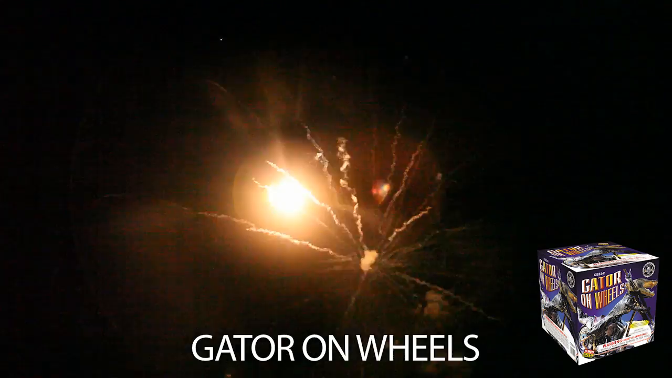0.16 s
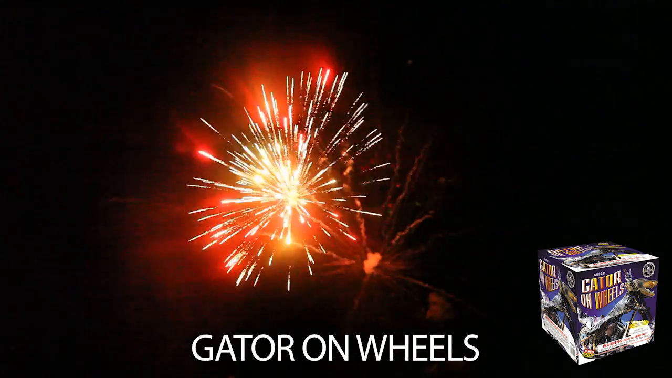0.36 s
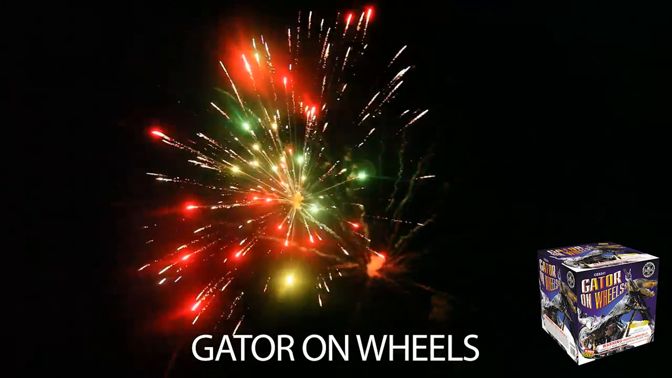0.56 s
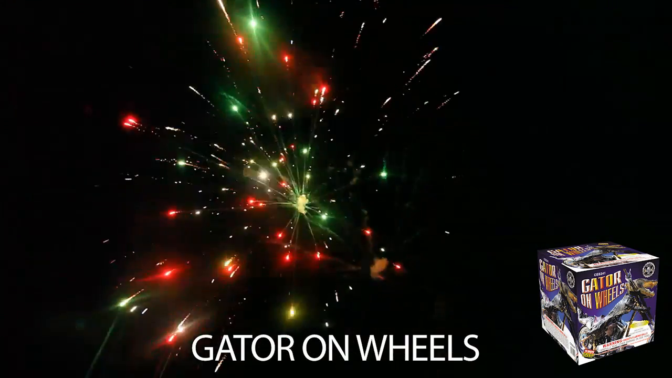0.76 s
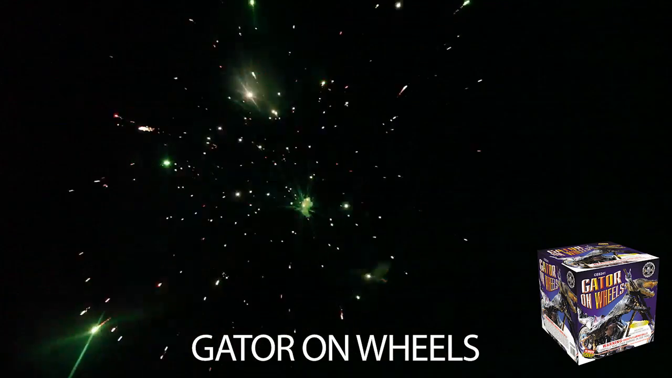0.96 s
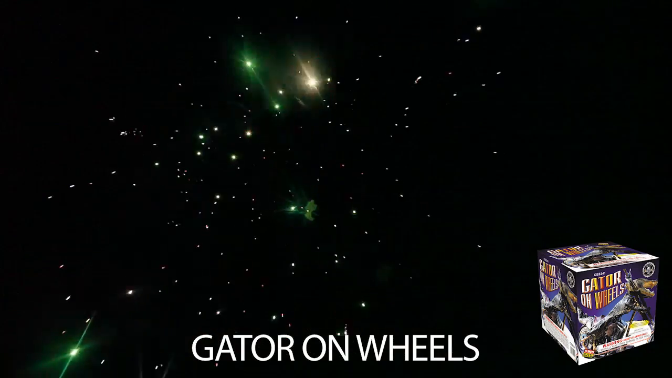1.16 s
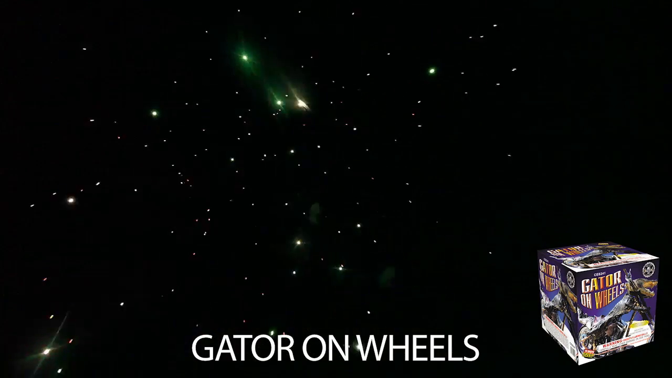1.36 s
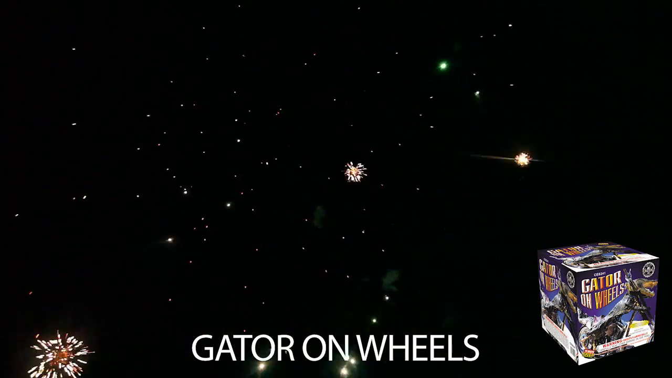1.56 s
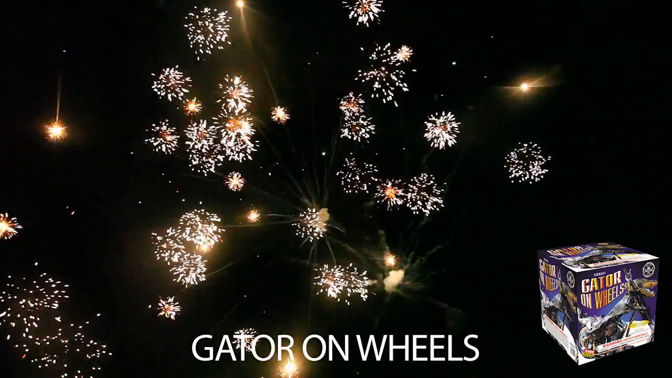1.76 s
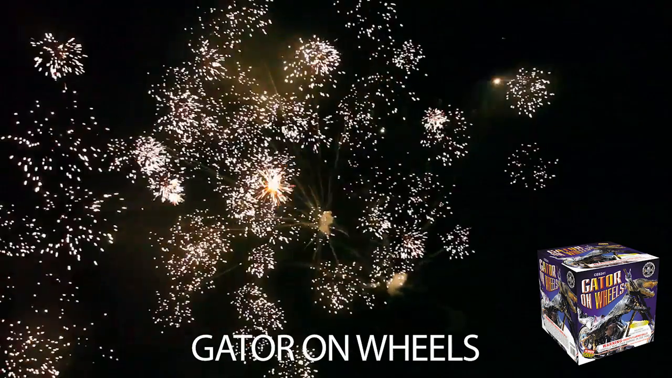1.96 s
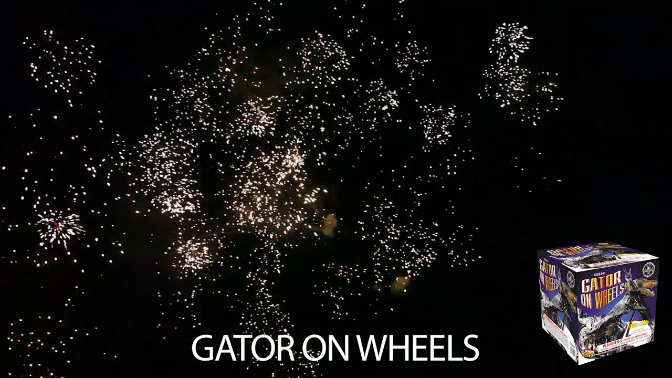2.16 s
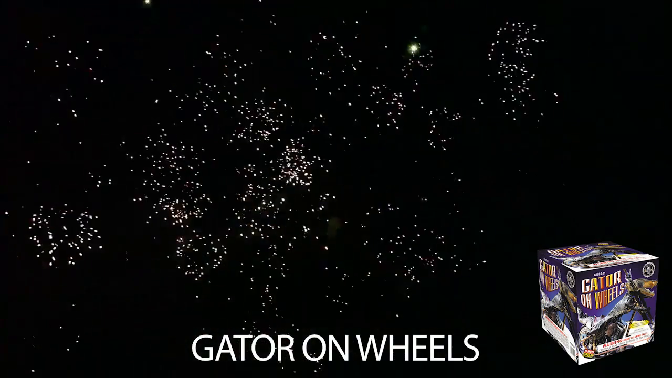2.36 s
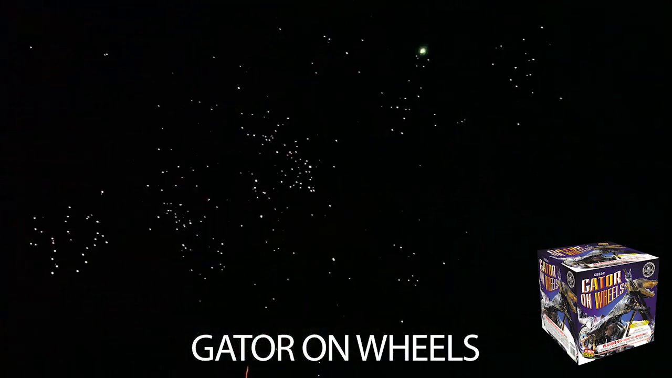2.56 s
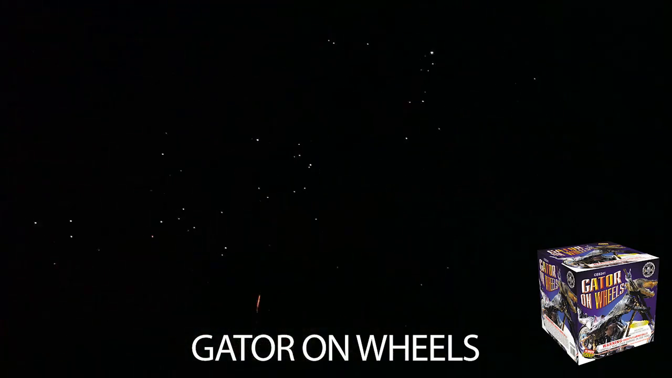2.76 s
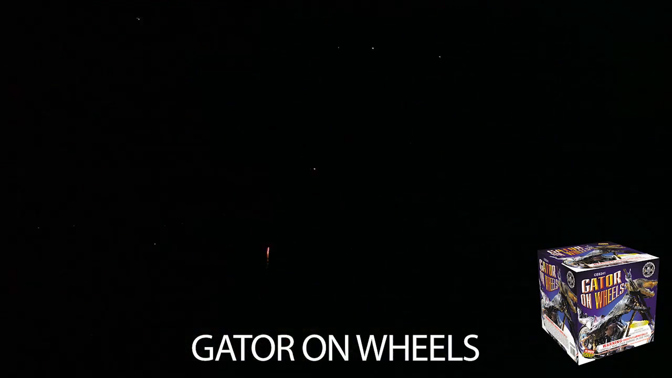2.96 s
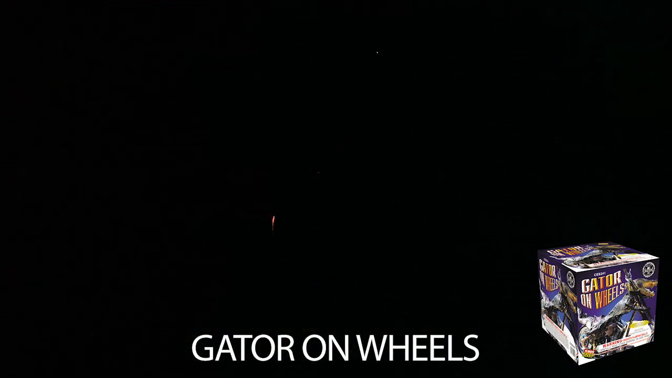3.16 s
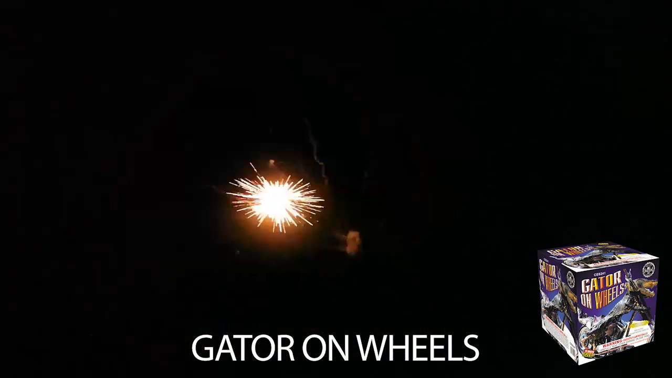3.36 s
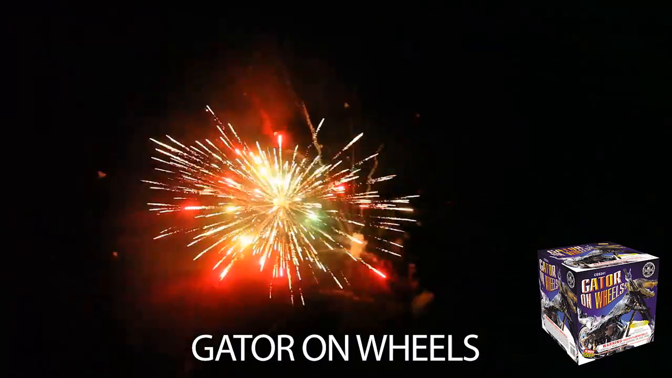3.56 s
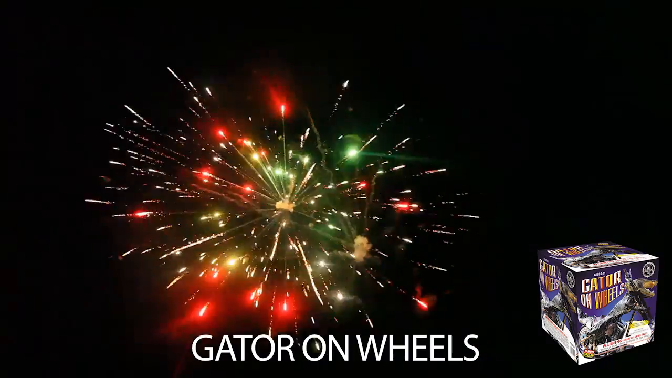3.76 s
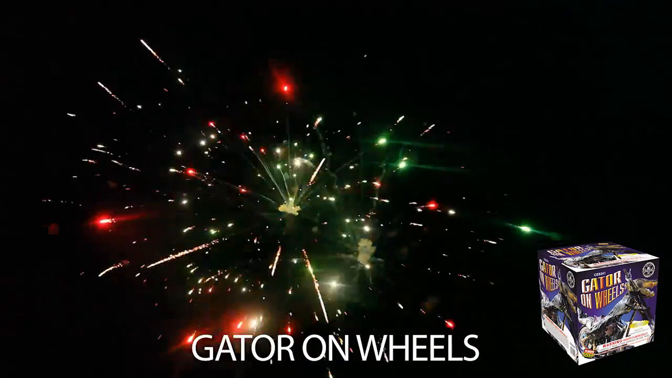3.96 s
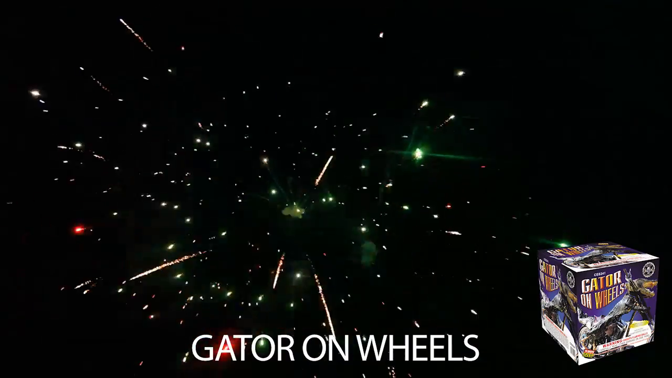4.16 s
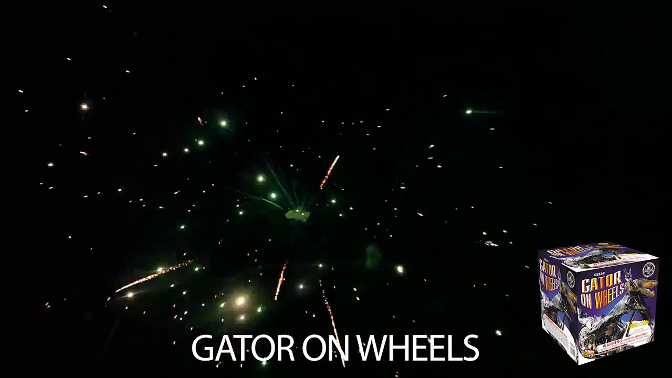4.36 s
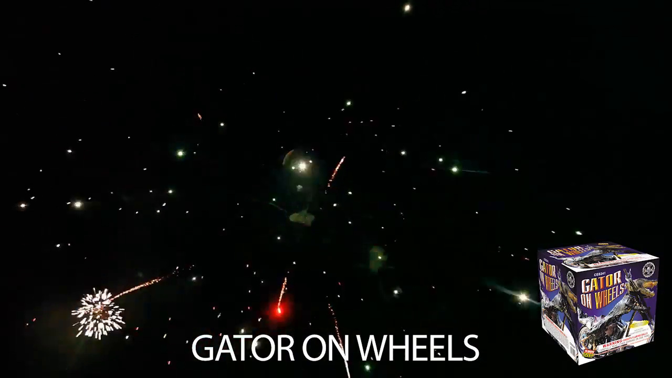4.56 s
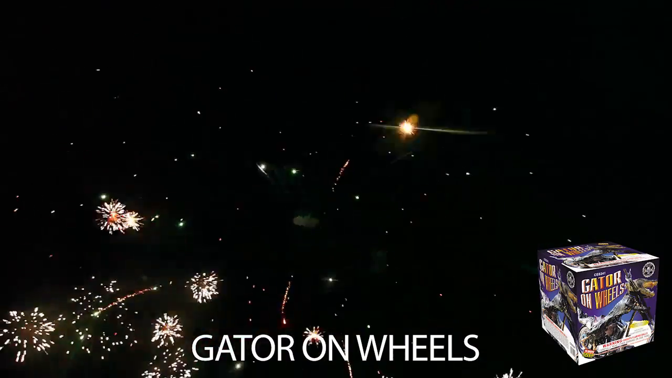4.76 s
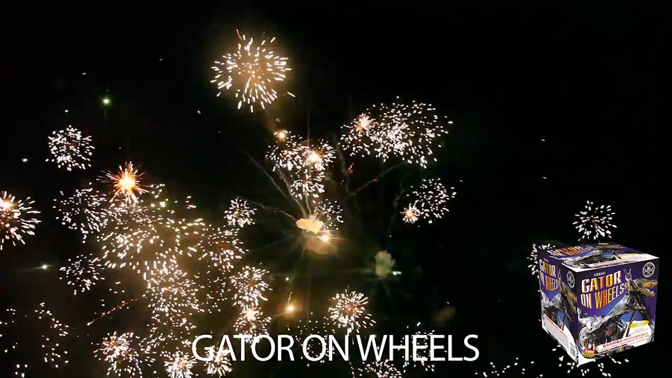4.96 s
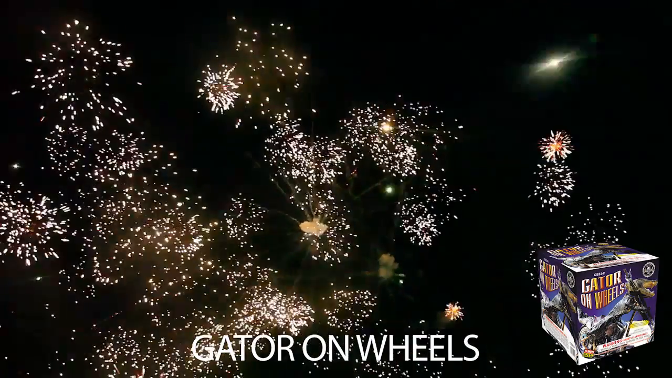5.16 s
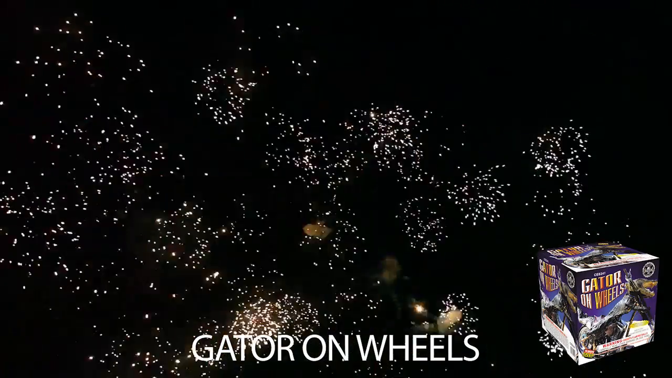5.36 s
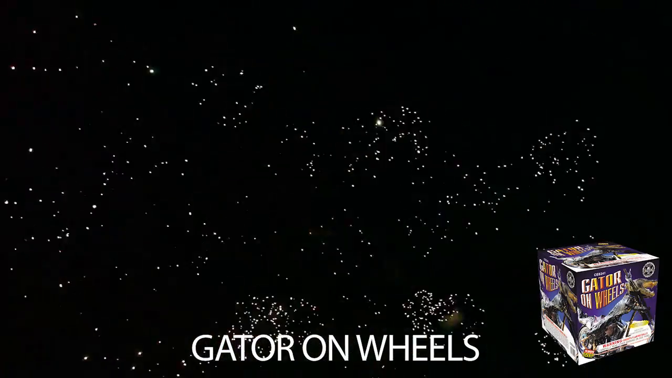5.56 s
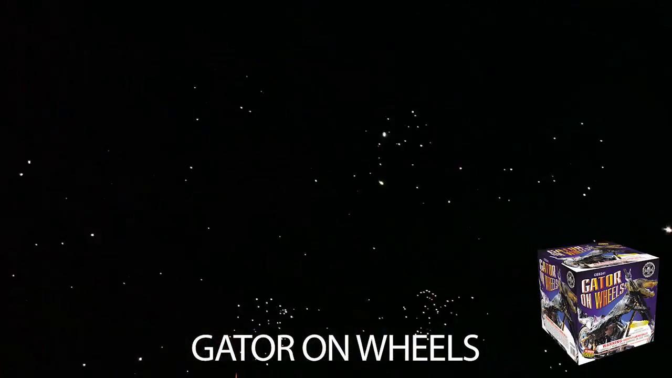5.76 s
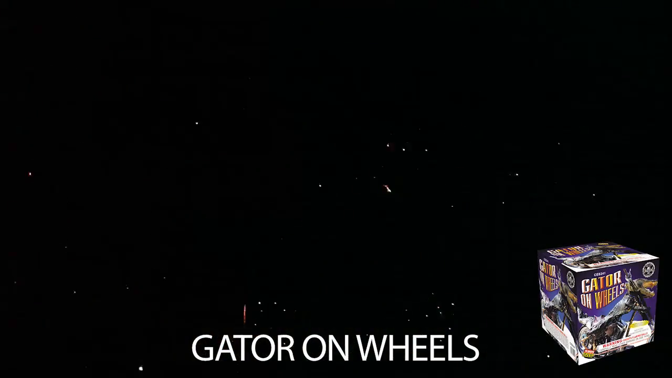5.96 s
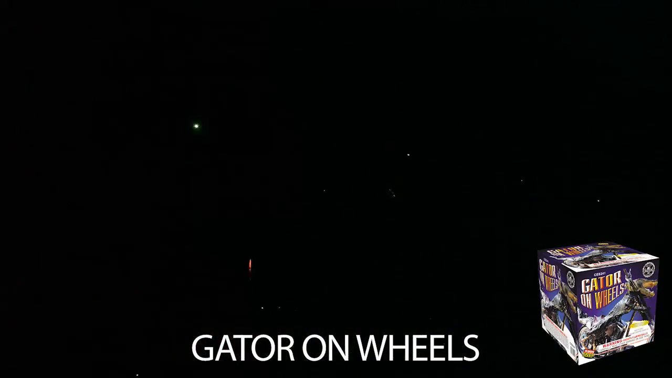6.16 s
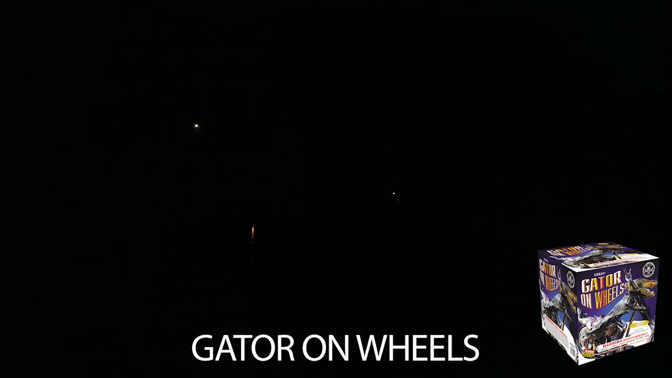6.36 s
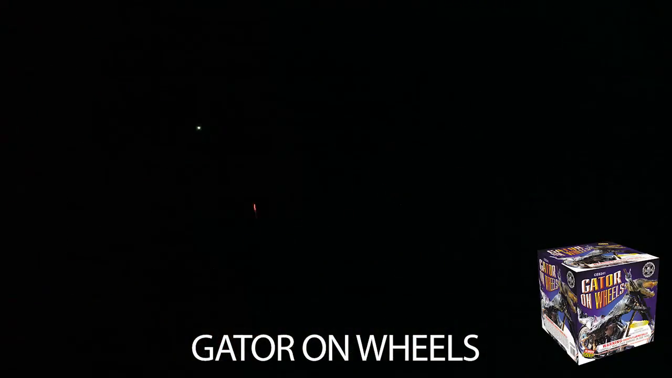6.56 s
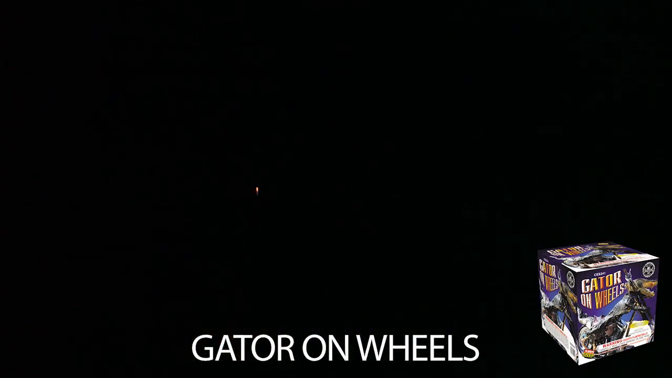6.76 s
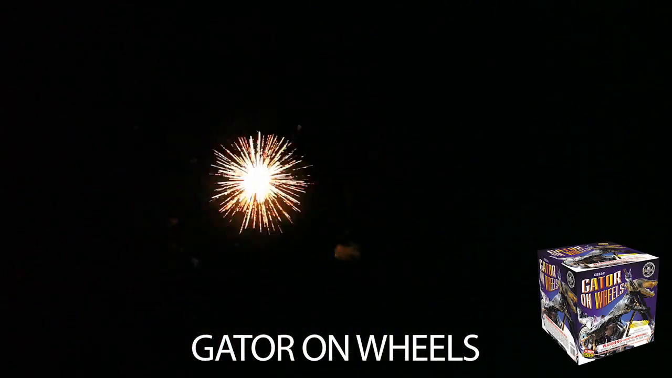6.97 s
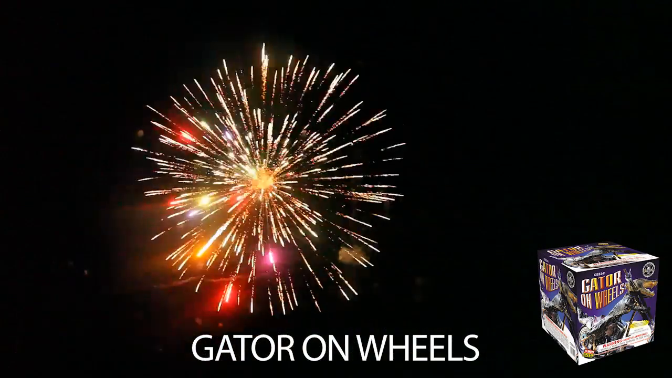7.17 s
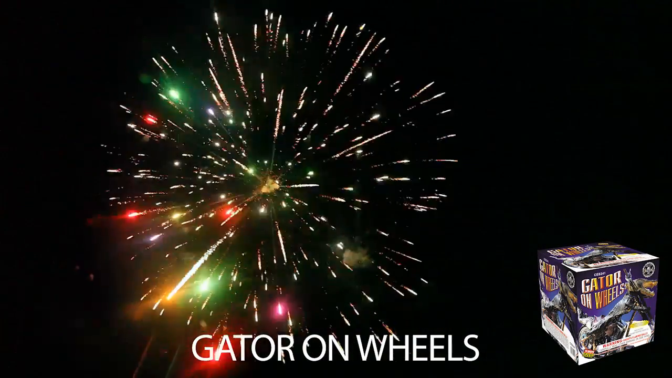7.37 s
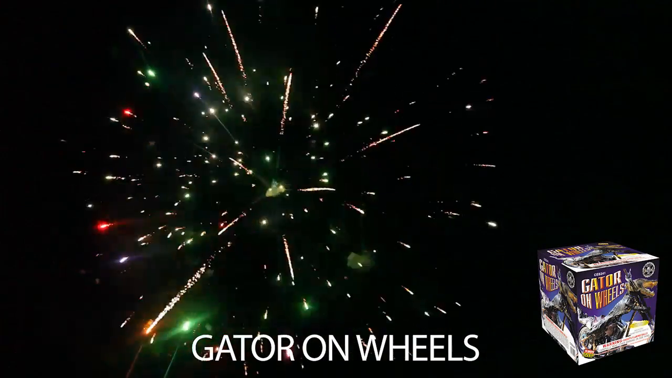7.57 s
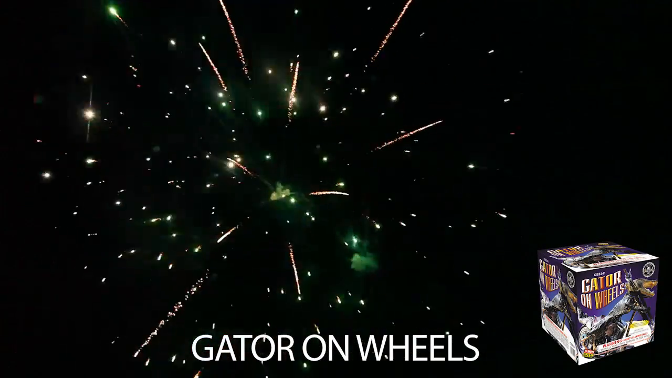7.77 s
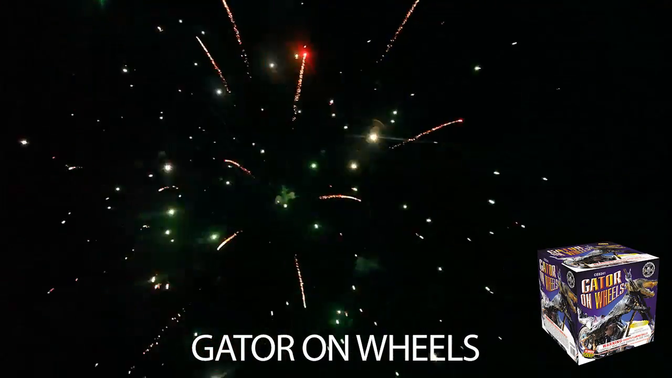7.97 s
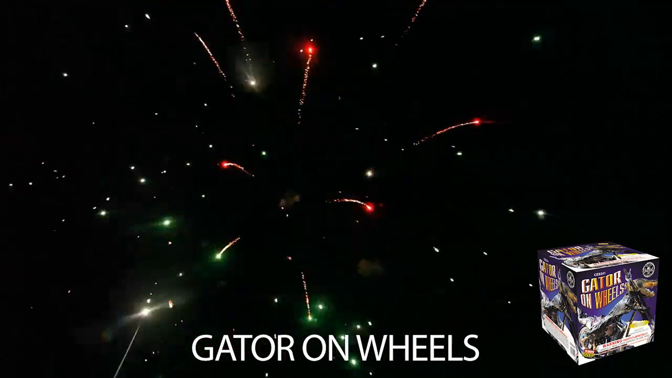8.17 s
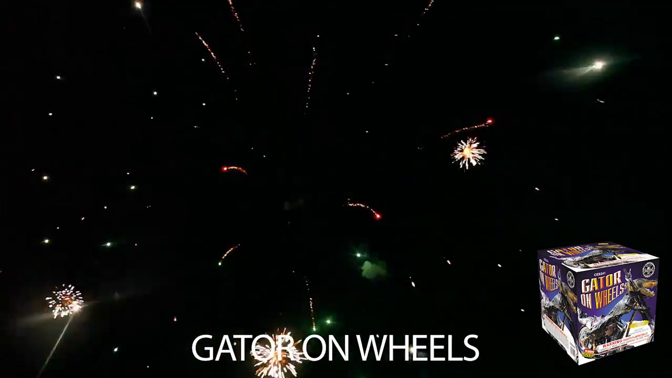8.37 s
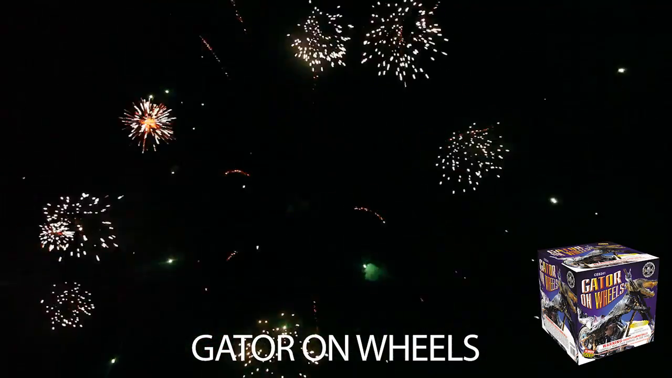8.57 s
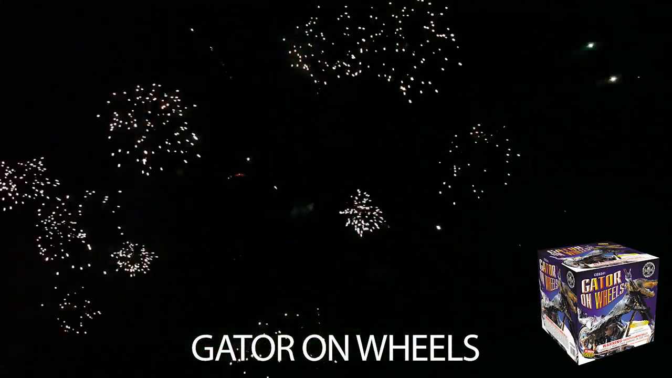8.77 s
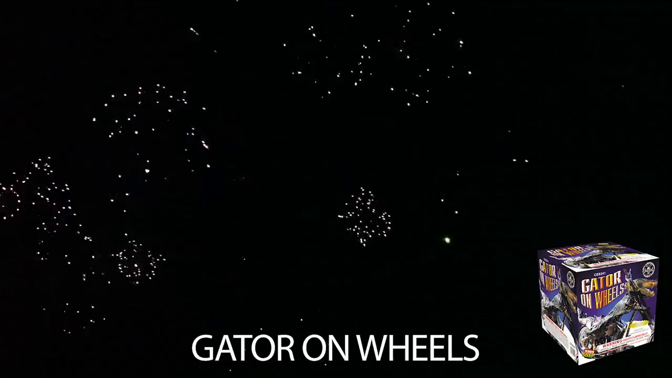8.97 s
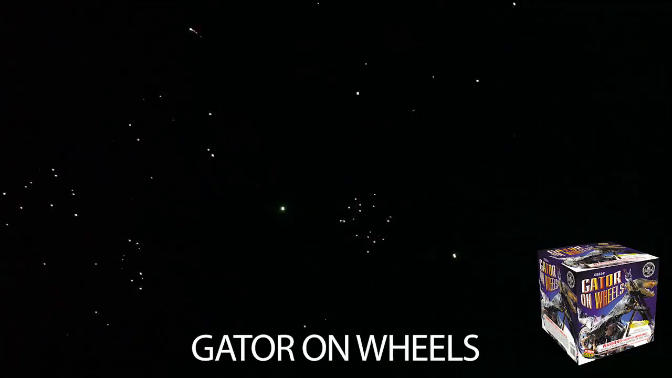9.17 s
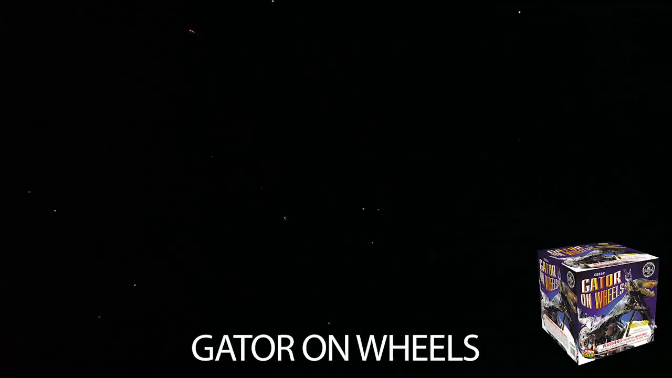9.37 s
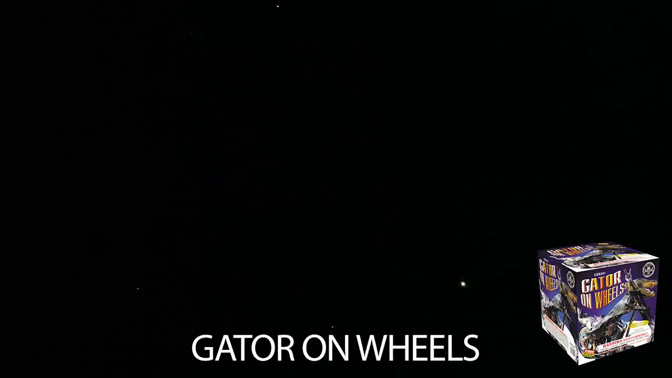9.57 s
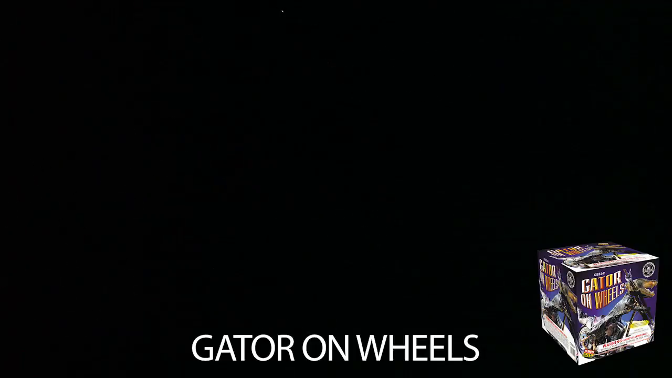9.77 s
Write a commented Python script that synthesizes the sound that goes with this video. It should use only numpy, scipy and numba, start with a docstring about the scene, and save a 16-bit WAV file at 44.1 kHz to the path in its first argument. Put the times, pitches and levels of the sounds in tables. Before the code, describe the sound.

Fireworks fire shot after shot in open air: loud overhead bursts, rolling echoes, brief rapid crackles and hollow launch thumps.

```python
"""A fireworks cake (a box of tubes that fire in turn) goes off over open ground at night.
Each shot thumps out of its tube, climbs with a hissing fuse and bursts overhead a second or so later.
Its stars (burning pellets) end in a volley of crackling pops, each one a tiny blast.
The echoes roll away over the land. The big blasts overload a small microphone nearby
and push its automatic volume control down."""
import sys
import numpy as np
from scipy import signal
from scipy.fft import rfft, irfft, next_fast_len
from scipy.io import wavfile
from numba import njit

SR = 44100
rng = np.random.default_rng(int(sys.argv[2]) if len(sys.argv) > 2 else 0)


def store_pcm(level_fs):
    """Save levels as 16-bit WAV."""
    pcm = np.round(np.clip(level_fs, -1, 1) * 32767).astype(np.int16)
    wavfile.write(sys.argv[1], SR, np.atleast_2d(pcm).T)


N = 433499

# Levels in a table compare its rows with each other; filters and gains follow.
# tone of the still night air: f/Hz, level/dB
NIGHT_TONE = [(25, -4), (50, 6.5), (120, -12), (200, -23.5), (520, -28), (780, -23), (1500, -34),
              (2700, -41), (4300, -40), (5400, -50), (9000, -48), (16000, -51.5)]
# shells bursting overhead: t/s, level/dB, length of the push/ms
SHELL_BURSTS = [(0.3567, 31.5, 0.61), (3.5023, 31, 0.64), (7.1087, 31.5, 0.67)]
# tone of the echoes from things close by: f/Hz, level/dB
NEAR_TONE = [(80, -3.5), (350, 7.5), (560, 4.5), (900, 4.5), (2000, -1.5), (4600, -1.5), (5600, 12),
             (7000, 1.5), (15000, 3.5)]
# tone of the echoes from the land: f/Hz, level/dB, loss in the air/(dB/s) (below 0 counts as 0)
LAND_TONE = [(40, -16.5, 8.5), (100, -3, -3), (200, 0, 2.5), (334, 2, 19.5), (570, -16.5, -1),
             (910, -7, -5), (2000, -4.5, -17), (4200, -4.5, -17), (5600, -3.5, 7.5), (8000, -10.5, 23),
             (14800, -19, 59.5)]
# echoes from distant trees and slopes: delay/s, level/dB, spread/s, lowest f/Hz, highest f/Hz
DISTANT_ECHOES = [(.08, -24, 0.028, 280, 516), (0.171, -34.5, 0.014, 130.2, 413.5),
                  (.31, -36.5, 0.015, 110, 330), (1.29, -53, 0.012, 100.2, 220)]
# loud or lone stars popping: t/s, level/dB, lag of the ground echo/ms
STAR_POPS = [(1.6688, 9.5, 4.07), (1.7702, 6, 3.4), (1.7733, 2, 6.2), (1.7976, -2, 5.1), (1.803, 10, 6.3),
             (1.8106, 8.5, 4), (1.8147, 4, 5.5), (1.8351, 0, 5.7), (1.841, 7.5, 5.3), (1.8563, -1, 6.2),
             (1.8623, 6, 6), (1.8799, 5.5, 4.9), (1.888, 10, 5.2), (1.9553, 11.5, 3.2), (2.016, 8, 3.1),
             (2.0355, 1.5, 5.3), (2.0418, 5, 6.3), (2.0617, 9, 6.1), (2.134, 7.5, 5.4), (2.1785, 0.5, 4.5),
             (2.1824, -4.5, 5), (2.2023, 10.5, 7.3), (2.21, 3.5, 5.2), (2.2594, 5.5, 5.9),
             (2.2668, 2.5, 4.8), (2.3169, 7.5, 3.9), (2.335, 6, 4.5), (2.377, 3.5, 5.6), (4.599, 5, 3.75),
             (4.6831, 5.5, 4.35), (4.8281, 7, 6.9), (4.8315, 1.5, 4), (4.8772, 13, 3.3), (4.8807, 6, 4.6),
             (4.913, 8.5, 5.3), (4.9295, 2, 4.4), (4.9378, 13, 4.5), (4.9543, -1, 4.6), (4.966, 2, 5.5),
             (4.979, 1.5, 4.2), (5.0035, 11, 5.6), (5.047, 3, 7.4), (5.0652, 13, 5.6), (5.1139, 8.5, 4.5),
             (5.1187, 5.5, 5), (5.162, 6.5, 4.4), (5.219, 7.5, 4.8), (5.2793, -5, 3.1), (5.2865, 5, 6.1),
             (5.3015, 3, 4.0), (5.3229, 5, 4.3), (5.3312, 4, 3.9), (5.3707, 9.5, 4), (5.4123, 0.5, 4.3),
             (5.448, 2.5, 3.8), (5.462, 3, 4.4), (5.5321, 0.5, 3.9), (5.6577, 3.5, 4.4), (8.463, 8.5, 4.4),
             (8.5145, 7.5, 5.2), (8.5333, 3, 3.6), (8.544, 10, 6.4), (8.585, 8, 6.4), (8.5975, 3, 7.1),
             (8.6043, 3.5, 4.7), (8.668, 3, 5.7), (8.7603, 0.5, 4.7), (8.7993, 6.5, 4.8), (8.8579, 2, 5.1),
             (8.8762, 10, 6.3), (8.917, 3.5, 4.5)]
# flurries of pops too fast to tell apart: start t/s, length/s, rate/(pops/s)
POP_FLURRIES = [(1.885, .043, 270), (1.934, .072, 228), (2.056, 0.03, 210), (2.096, 0.039, 183),
                (4.995, .039, 150), (5.042, .053, 280), (5.148, 0.057, 207), (5.229, .031, 182)]
# charges that lift the shells out of their tubes: t/s, level/dB, length of the push/ms
LAUNCHES = [(2.2721, 17.5, 0.7), (5.4415, 15, 0.98), (9.4865, 18, 0.75)]
# ringing of a tube's air and cardboard: f/Hz, level/dB, time to fade by 60 dB/s
TUBE_RINGS = [(196, -13, 0.074), (344, -12, 0.02), (452.7, -15, 0.017), (835, -13.5, 0.016)]
# soft, dull knocks from far away: t/s, level/dB
FAR_KNOCKS = [(2.82, -53), (2.95, -55.5), (2.997, -51.5), (3.05, -57), (3.18, -61), (6.1, -58.5),
              (6.145, -57), (6.2, -57), (6.33, -64.5), (9.66, -66), (9.75, -57)]


def from_db(db):
    """Turn decibels into a factor to multiply by."""
    return 10 ** (np.asarray(db) / 20)


def seconds(length):
    """The time of each sample in a span of this length."""
    return np.arange(int(length * SR)) / SR


def butter(x, hz, kind, order=2):
    """Keep the lows, the highs or one band of a sound."""
    sections = signal.butter(order, hz, kind, fs=SR, output="sos")
    return signal.sosfilt(sections, x + 1e-18)


def resonance(x, hz, width_hz):
    """Keep a narrow, ringing band around one pitch."""
    r = np.exp(-np.pi * width_hz / SR)
    feedback = [1, -2 * r * np.cos(2 * np.pi * hz / SR), r * r]
    return signal.lfilter(np.array([1, 0, -1]) * (1 - r * r) / 2, feedback, x + 1e-18)


def log_bins(size):
    """The logarithm of each frequency in a spectrum."""
    return np.log(np.maximum(np.fft.rfftfreq(size, 1 / SR), 1))


def coloured_noise(tone, size):
    """Noise shaped by rows of f/Hz, level/dB."""
    hz, db = np.transpose(tone)
    padded = next_fast_len(size)
    gains = from_db(np.interp(log_bins(padded), np.log(hz), db))
    return irfft(rfft(rng.standard_normal(padded)) * gains, padded)[:size]


def flutter(size, rate_hz):
    """A slow random wobble, about 1 in size."""
    slow = butter(rng.standard_normal(size + SR // 4), rate_hz, "low")[-size:]
    return slow / slow.std()


def delayed(x, ms):
    """The same sound a little later."""
    samples = np.arange(len(x))
    return np.interp(samples - ms * SR / 1000, samples, x, left=0)


def add(track, s, sound):
    """Mix a sound into the track at s seconds."""
    at = int(round(s * SR))
    track[at:at + len(sound)] += sound[:max(N - at, 0)]


def night(level_db=-50.5):
    """The open air rumbles low and hisses faintly."""
    air = coloured_noise(NIGHT_TONE, N)
    return from_db(level_db) * air / air.std()


def fuses(launch_db=-58, fade_db_per_s=40, top_db=-72, swell_db_per_s=31.5, sputter_db=3):
    """A shell's fuse sputters and fades as it climbs; the hiss swells again just before the burst."""
    hiss = butter(rng.standard_normal(N), [1900, 5800], "band")
    t, level = np.arange(N) / SR, np.zeros(N)
    for s, _, _ in LAUNCHES:
        age = np.maximum(t - s - 0.06, 0)   # the hiss starts just after the thump
        level += np.minimum(age / 0.013, 1) * from_db(launch_db - fade_db_per_s * age)
    for s, _, _ in SHELL_BURSTS:
        level += (t < s) * from_db(top_db - swell_db_per_s * np.abs(s - t))
    return level * from_db(sputter_db * flutter(N, rate_hz=35)) * hiss / hiss.std()


def blast(push_ms, length_s):
    """An explosion gives the air a sudden short push, then a longer, weaker pull."""
    age = seconds(length_s) * 1000 / push_ms
    return np.diff(age * np.exp(-age)) / age[1]


def bursts(gas_db=-22, gas_s=0.013, gas_hz=900):
    """A shell splits: one heavy blast and a brief rush of gas."""
    out = np.zeros(N)
    for s, db, push_ms in SHELL_BURSTS:
        bang = blast(push_ms, length_s=0.1)
        t = np.arange(len(bang)) / SR
        gas = butter(rng.standard_normal(len(t)), gas_hz, "low", order=1) * np.exp(-t / gas_s)
        add(out, s, from_db(db) * (bang + from_db(gas_db) * gas))
    return out


def with_bounce(x, delay_ms, gain_db, dull_hz):
    """A sound plus one duller copy that bounces off a surface."""
    return x + from_db(gain_db) * butter(delayed(x, delay_ms), dull_hz, "low", order=1)


def near_echoes(fade_s, build_s=0.012):
    """Things near the microphone answer a click with a short spray of echoes."""
    t = seconds(0.2)
    shape = (1 - np.exp(-t / build_s)) * np.exp(-t / fade_s)
    return coloured_noise(NEAR_TONE, len(t)) * shape / np.sqrt(SR)


def land_echoes(fade_s=0.091, steepness=1.953, build_s=0.058, lumpy_db=3.3):
    """The land answers a click with countless fading echoes; the air takes the top treble first."""
    t = seconds(2.5)
    white, bins = rfft(rng.standard_normal(len(t))), log_bins(len(t))
    centres, out = np.log([row[0] for row in LAND_TONE]), 0
    for share, (hz, db, loss) in zip(np.eye(len(LAND_TONE)), LAND_TONE):
        band = irfft(white * np.interp(bins, centres, share), len(t))
        # large obstacles return the bass in separate rolls
        lumps = lumpy_db * min(1, 500 / hz) * flutter(len(t), rate_hz=20)
        out = out + band * from_db(db + lumps - max(loss, 0) * t)
    out = out * (1 - np.exp(-t / build_s)) * (1 + t / fade_s) ** -steepness
    for delay, db, spread, low_hz, high_hz in DISTANT_ECHOES:
        swell = np.exp(-0.5 * ((t - delay) / spread) ** 2) / np.sqrt(2 * spread)
        out += from_db(db) * swell * butter(rng.standard_normal(len(t)), [low_hz, high_hz], "band")
    return out / np.sqrt(SR)


def echoes(x, near_db, near_s, near_hz, far_db):
    """A sound comes back from near and far; each source gets its own random paths."""
    near = signal.fftconvolve(x, near_echoes(near_s))[:N]
    far = signal.fftconvolve(x, land_echoes())[:N]
    return from_db(near_db) * butter(near, near_hz, "low", order=1) + from_db(far_db) * far


def burning_stars(level_db=-66, burn_s=1.25, fade_db_per_s=7, sputter_db=2.5):
    """After each burst the flying stars hiss faintly as they burn."""
    out, t = np.zeros(N), seconds(burn_s)
    for s, _, _ in SHELL_BURSTS:
        hiss = butter(rng.standard_normal(len(t)), [1500, 8000], "band", order=1)
        level = from_db(level_db - fade_db_per_s * t - sputter_db * flutter(len(t), rate_hz=40))
        add(out, s, level * hiss * signal.windows.tukey(len(t), 0.5))
    return out


def crackle(pops, push_ms=0.15, thin_hz=300, air_hz=5000, ground_db=-10, ground_hz=3200):
    """Each star pops with its own size and brightness. Returns the direct sound and its ground echo."""
    direct, ground = np.zeros((2, N))
    for s, db, lag_ms in pops:
        size, bounce, bright = rng.uniform(-1, 1, 3)
        pop = blast(push_ms * np.exp(0.39 * size), length_s=0.012)
        pop = from_db(db) * butter(pop, thin_hz, "high")
        add(direct, s, butter(pop, air_hz * np.exp(0.25 * bright), "low"))
        add(ground, s, from_db(ground_db + 1.5 * bounce) * delayed(pop, lag_ms))
    return direct, butter(ground, ground_hz, "low")


def housing_notch(x, depth=0.52):
    """The microphone's case weakens a narrow band of treble in sound from straight above."""
    return x - depth * resonance(x, hz=5680, width_hz=580)


def flurry_pops(level_db=1, spread_db=3.5, lag_range_ms=(3.5, 4.9)):
    """In a flurry, one star pops at a random moment in each short time slot. Rows as in STAR_POPS."""
    rows = []
    for start, length, per_s in POP_FLURRIES:
        slots = np.arange(64)
        when, size, height = rng.random((len(slots), 3)).T
        age = (slots + when) / per_s
        db = level_db + spread_db * np.sqrt(3) * (2 * size - 1)
        lag_ms = np.interp(height, [0, 1], lag_range_ms)   # higher stars echo later
        rows += list(np.transpose([start + age, db, lag_ms])[age < length])
    return rows


def launches(dull_hz=1800, thin_hz=240, gas_db=-27, gas_s=0.01, gas_hz=5500):
    """The lifting charge thumps, gas spits from the tube's mouth and the tube rings for a moment."""
    out = np.zeros(N)
    for s, db, push_ms in LAUNCHES:
        thump = blast(push_ms, length_s=0.15)
        t = np.arange(len(thump)) / SR
        for hz, ring_db, ring_s in TUBE_RINGS:
            ring = np.sin(2 * np.pi * hz * rng.normal(1, 0.041) * t)
            thump += from_db(ring_db - 60 * t / ring_s) * ring
        thump = butter(thump, dull_hz, "low", order=1)
        thump = butter(thump, thin_hz, "high")   # a narrow mouth gives off little bass
        gas = butter(rng.standard_normal(len(t)), gas_hz, "low") * np.exp(-t / gas_s)
        add(out, s, from_db(db) * (thump + from_db(gas_db) * gas))
    return out


def puffs(rows, band_hz, fade_s):
    """For each row of t/s, level/dB, a puff of noise swells quickly and dies away."""
    out, t = np.zeros(N), seconds(0.25)
    swell = t / fade_s * np.exp(1 - t / fade_s)
    for s, db in rows:
        noise = butter(rng.standard_normal(len(t)), band_hz, "band")
        add(out, s, from_db(db) * swell * noise / noise.std())
    return out


def embers(after_s=2.1, span_s=0.6, level_db=-53, fade_db=9, spread_db=6, count=7):
    """The last embers of each shell snap faintly at random after its volley."""
    snaps = []
    for s, _, _ in SHELL_BURSTS:
        when, size = rng.random((count, 2)).T
        db = level_db - fade_db * when + spread_db * (2 * size - 1)
        snaps += zip(s + after_s + span_s * when, db)
    return puffs(snaps, band_hz=[700, 4500], fade_s=0.0013)


def far_knocks():
    """Soft, smeared knocks arrive from far away."""
    return puffs(FAR_KNOCKS, band_hz=[595, 1040], fade_s=0.012)


def scene():
    """Mix the bursts, launches and crackle, each with its echoes, over the quiet sounds."""
    bangs, thumps = bursts(), launches()
    pops, ground_pops = crackle(list(STAR_POPS) + flurry_pops())
    shells = with_bounce(bangs, delay_ms=5.6, gain_db=-3, dull_hz=1960)   # off the ground
    shells = with_bounce(shells, delay_ms=8.4, gain_db=-22, dull_hz=6000)   # off a hard face nearby
    shells += echoes(bangs, near_db=5.5, near_s=0.021, near_hz=1500, far_db=1.5)
    tubes = with_bounce(thumps, delay_ms=8.21, gain_db=-5.5, dull_hz=3000)
    tubes += echoes(thumps, near_db=12, near_s=0.015, near_hz=900, far_db=-4.5)
    stars = housing_notch(pops) + ground_pops
    stars += echoes(pops, near_db=13, near_s=0.0099, near_hz=8960, far_db=0.5)
    quiet = night() + fuses() + burning_stars() + embers() + far_knocks()
    return (shells + tubes + from_db(4.5) * stars + quiet)[None]


@njit
def volume_control(x, target, max_gain, hold_s, attack_s, recover_db_per_s):
    """Peaks above the target pull the volume down quickly; then it creeps back up."""
    out, gain, peak = np.empty(len(x)), max_gain, 0.
    hold, rise = np.exp(-1 / (hold_s * SR)), 10 ** (recover_db_per_s / 20 / SR)
    for i in range(len(x)):
        peak = max(abs(x[i]), peak * hold)
        if peak * gain > target:
            gain -= (gain - target / peak) / (attack_s * SR)
        else:
            gain = min(gain * rise, max_gain)
        out[i] = x[i] * gain
    return out


def record(dry, bass_hz=115, ring_db=-10, top_hz=16000):
    """A small microphone with thin bass and a ringing opening overloads, then its volume control acts."""
    x = butter(dry[0], bass_hz, "high")
    x = x + from_db(ring_db) * resonance(x, hz=5500, width_hz=1200)
    x = np.clip(x, -1, 1)   # overload flattens the tallest peaks
    x = butter(x, 22, "high", order=1)   # centres the lopsided wave on zero again
    x = volume_control(x, target=0.41, max_gain=1.5, hold_s=0.0097, attack_s=0.0068, recover_db_per_s=8.5)
    return butter(np.clip(x, -1, 1), top_hz, "low", order=14)[None]


dry = scene()
out = record(dry)
store_pcm(out)
```